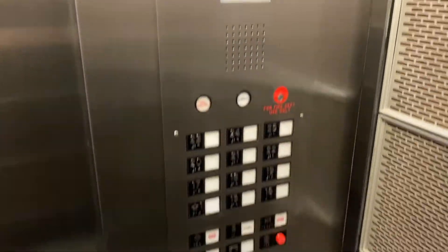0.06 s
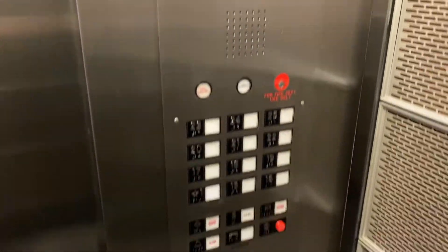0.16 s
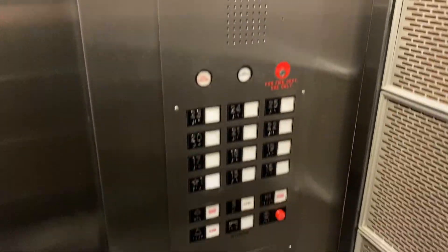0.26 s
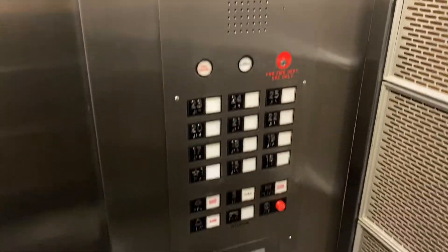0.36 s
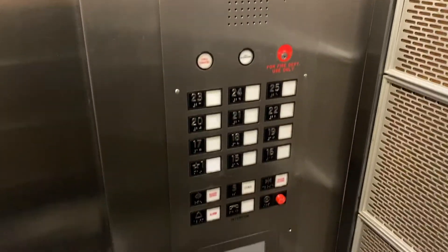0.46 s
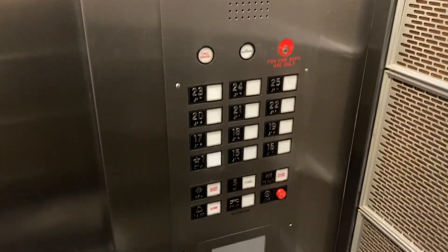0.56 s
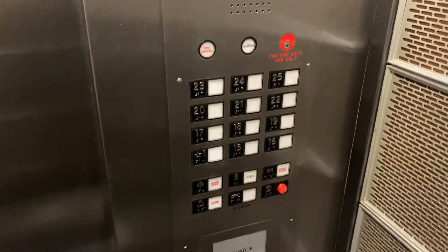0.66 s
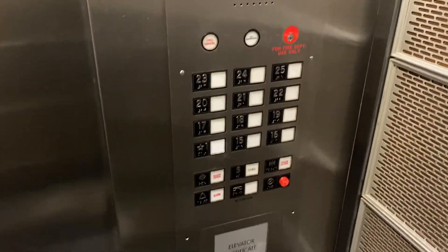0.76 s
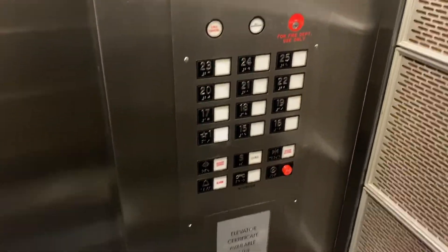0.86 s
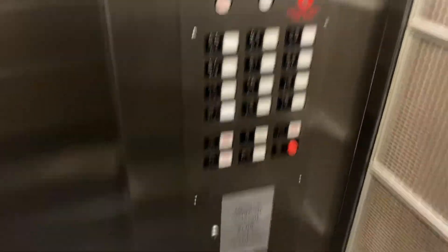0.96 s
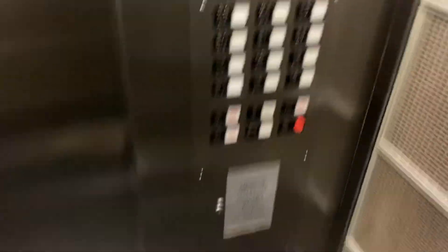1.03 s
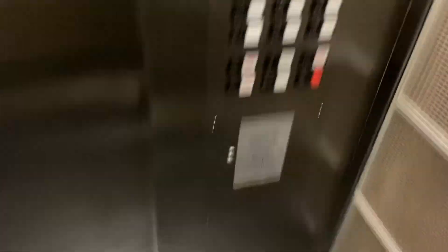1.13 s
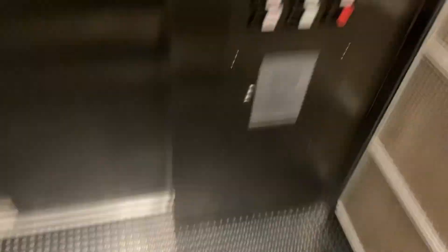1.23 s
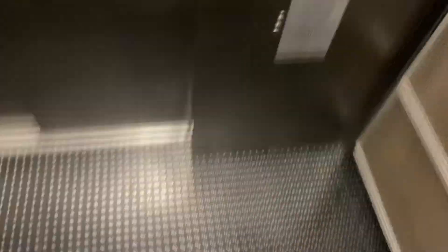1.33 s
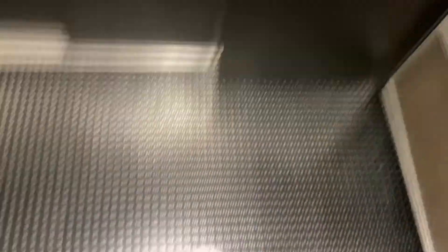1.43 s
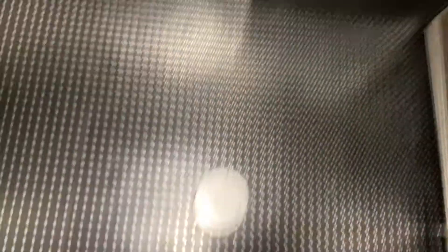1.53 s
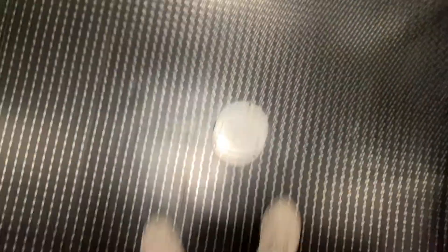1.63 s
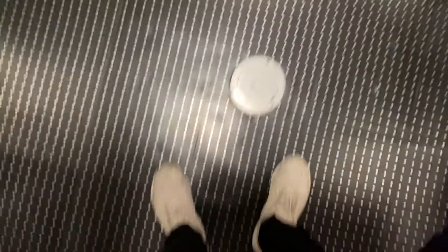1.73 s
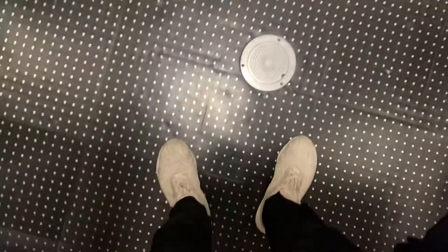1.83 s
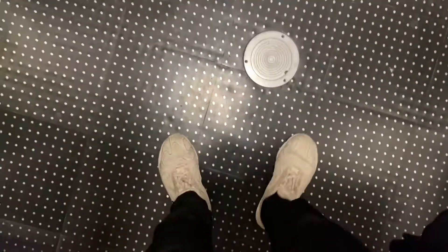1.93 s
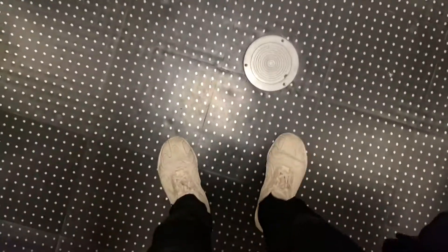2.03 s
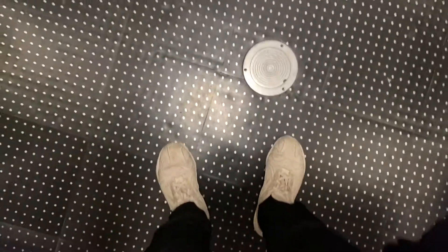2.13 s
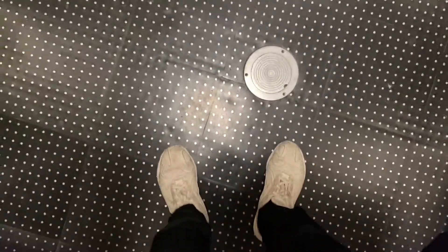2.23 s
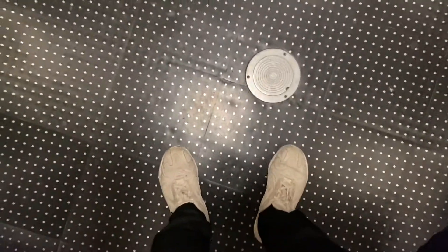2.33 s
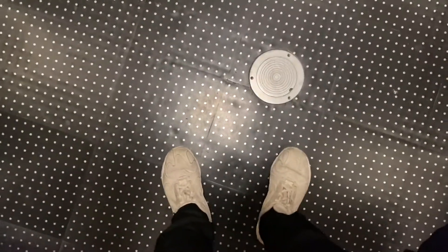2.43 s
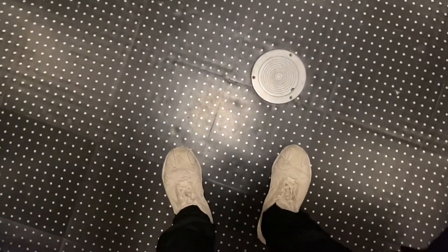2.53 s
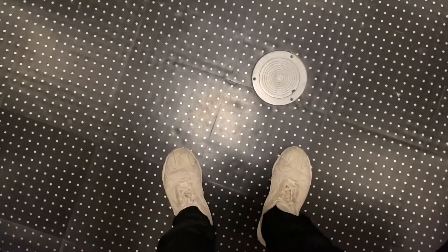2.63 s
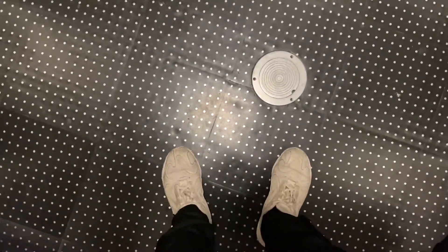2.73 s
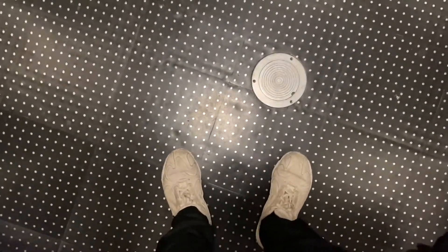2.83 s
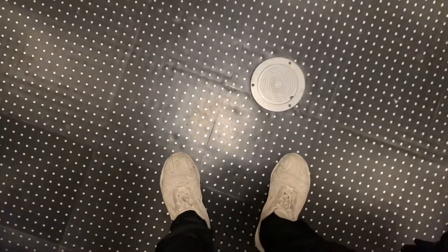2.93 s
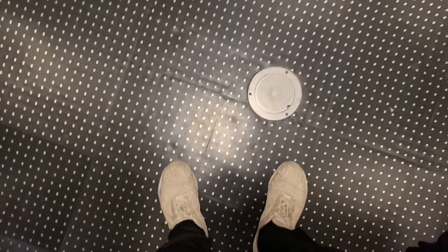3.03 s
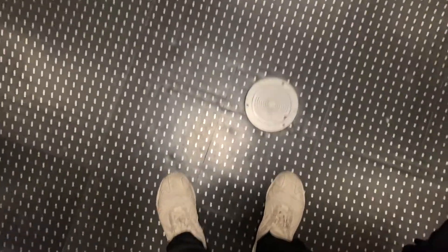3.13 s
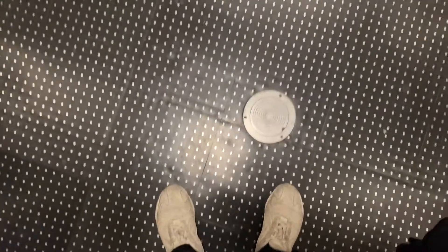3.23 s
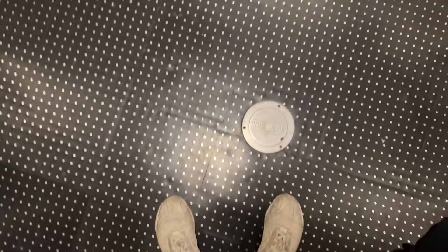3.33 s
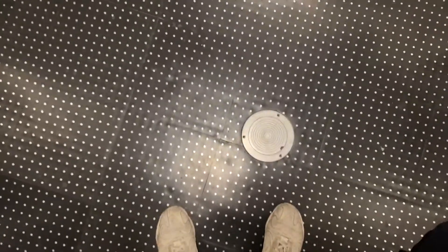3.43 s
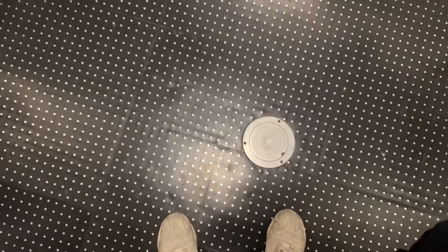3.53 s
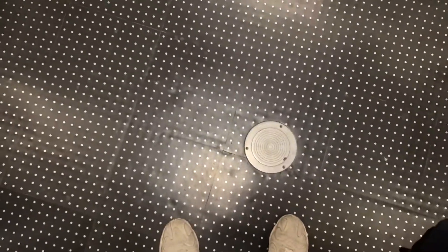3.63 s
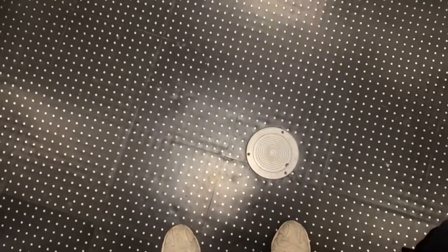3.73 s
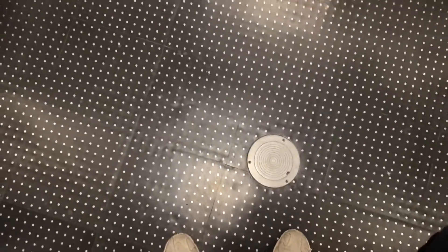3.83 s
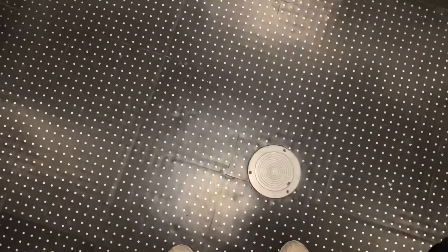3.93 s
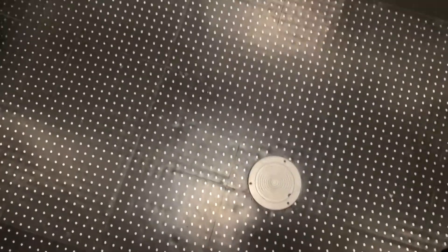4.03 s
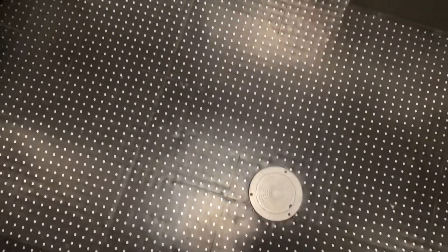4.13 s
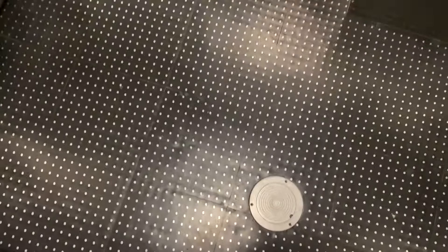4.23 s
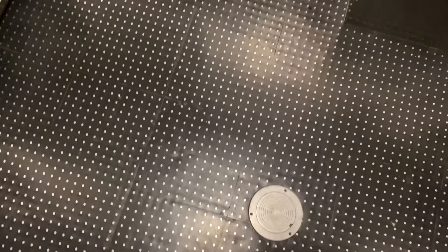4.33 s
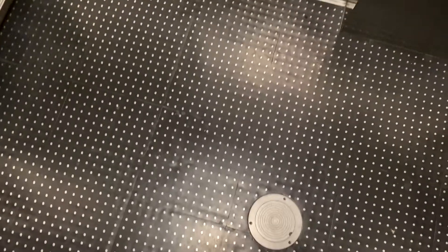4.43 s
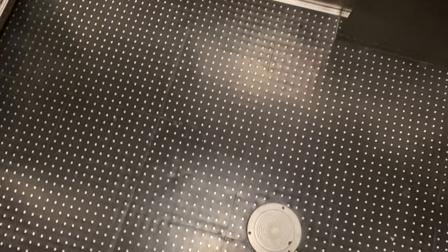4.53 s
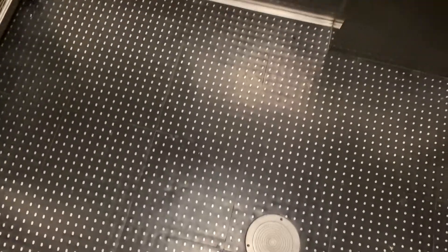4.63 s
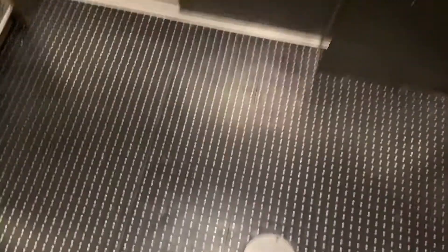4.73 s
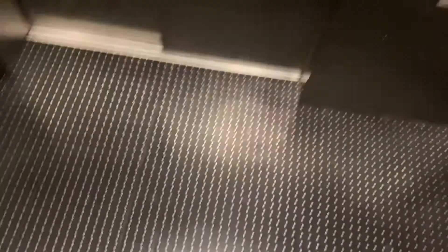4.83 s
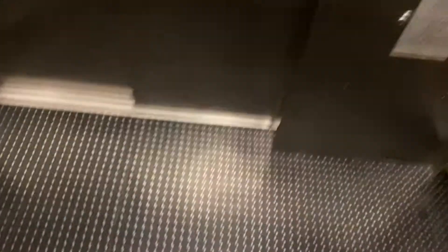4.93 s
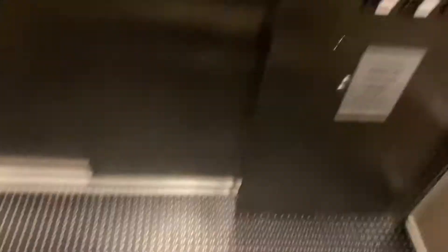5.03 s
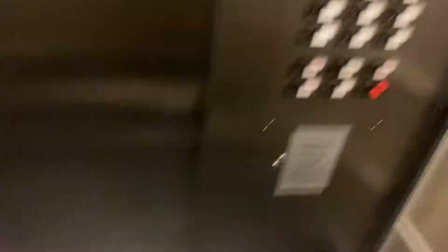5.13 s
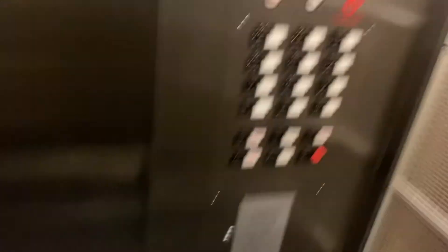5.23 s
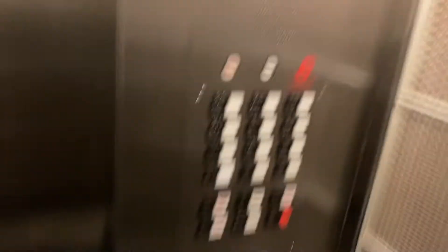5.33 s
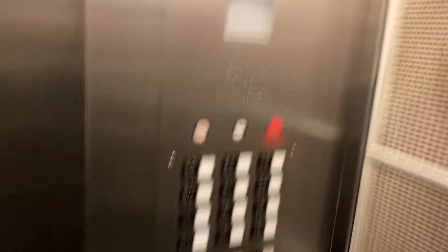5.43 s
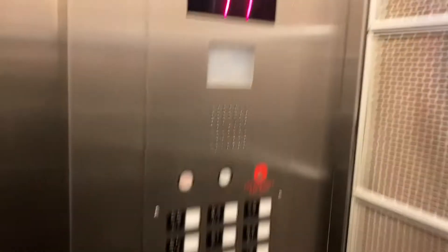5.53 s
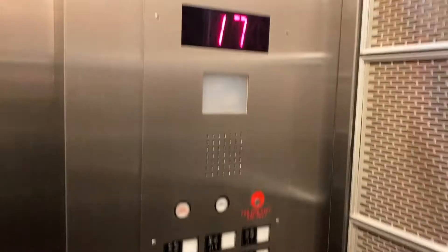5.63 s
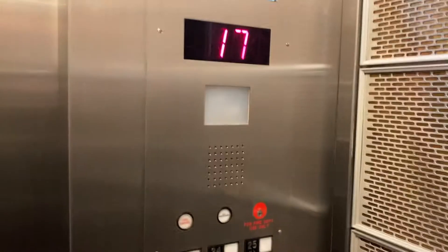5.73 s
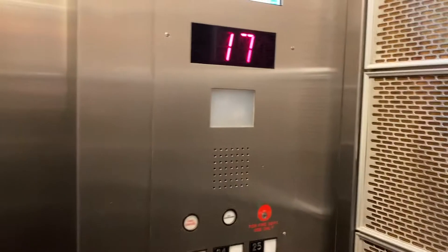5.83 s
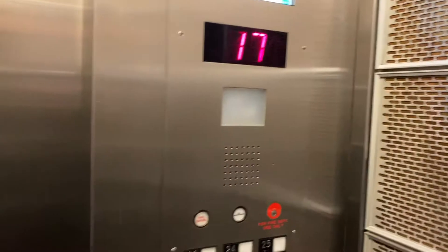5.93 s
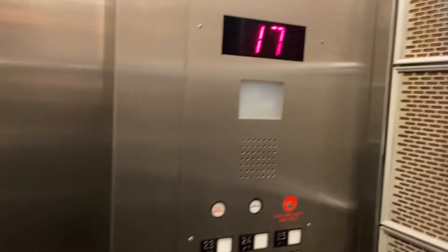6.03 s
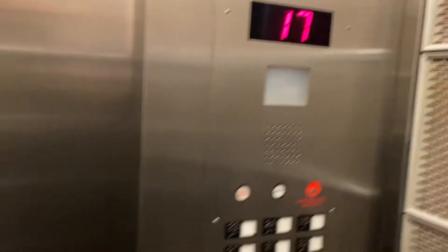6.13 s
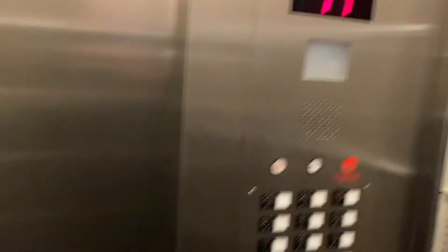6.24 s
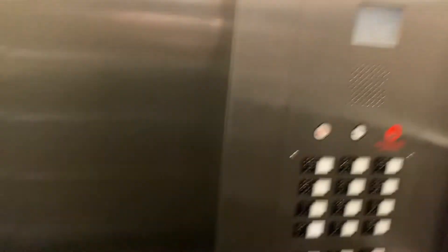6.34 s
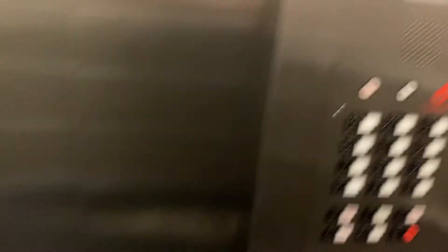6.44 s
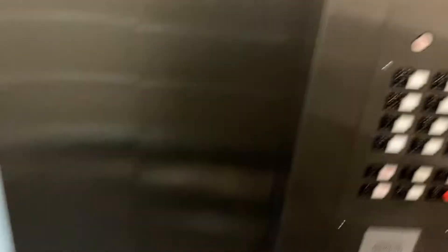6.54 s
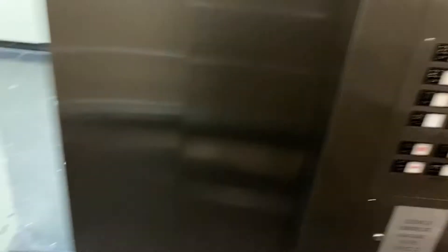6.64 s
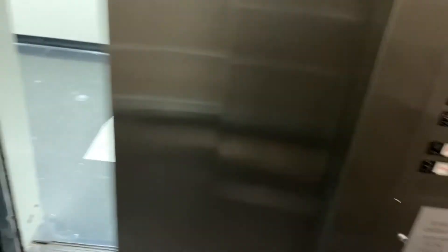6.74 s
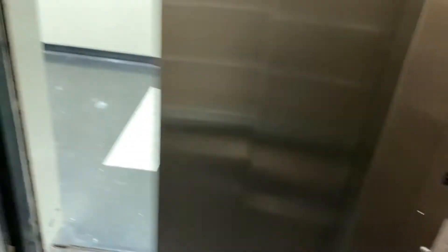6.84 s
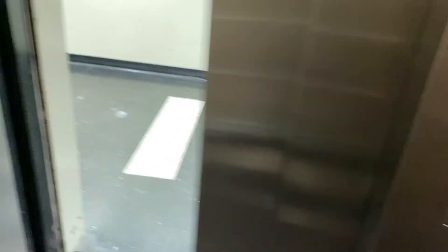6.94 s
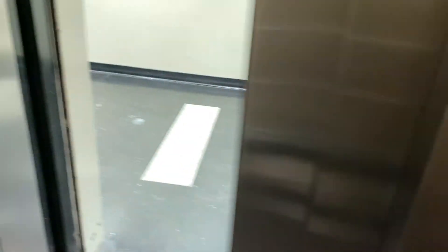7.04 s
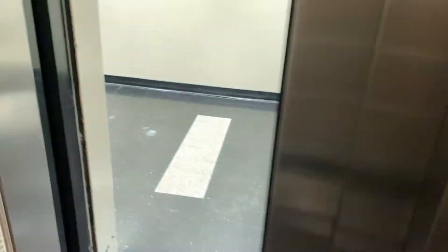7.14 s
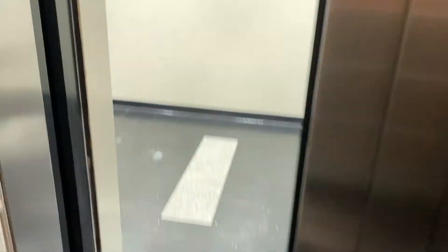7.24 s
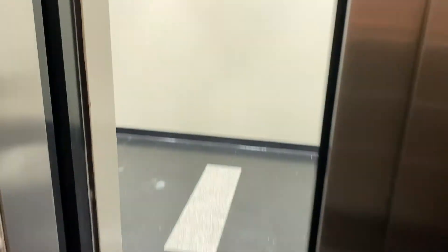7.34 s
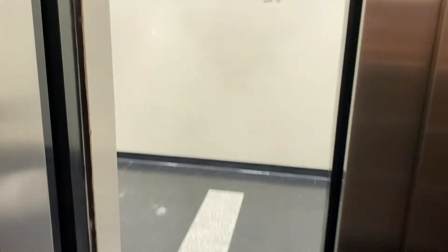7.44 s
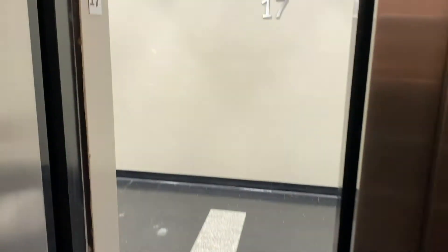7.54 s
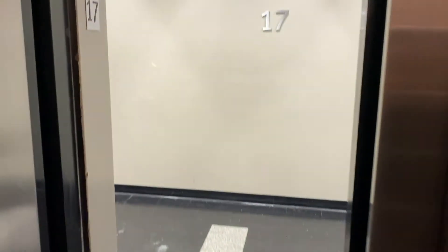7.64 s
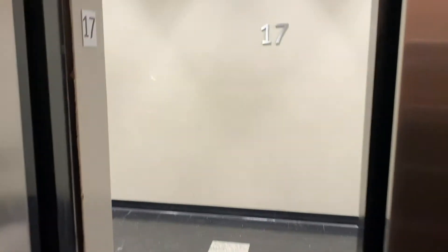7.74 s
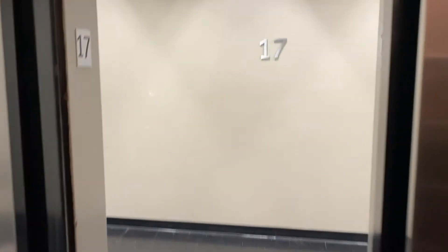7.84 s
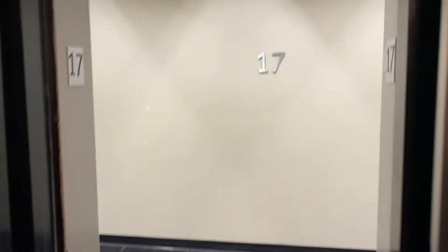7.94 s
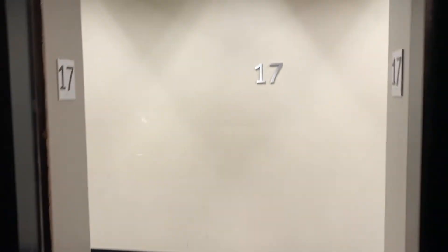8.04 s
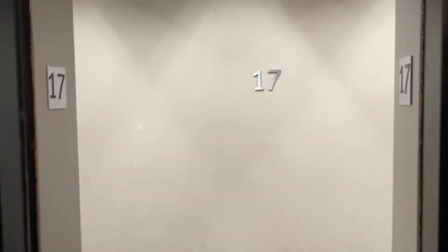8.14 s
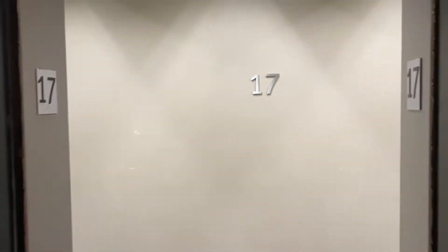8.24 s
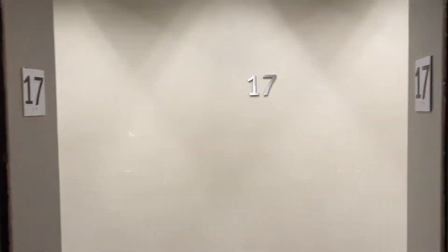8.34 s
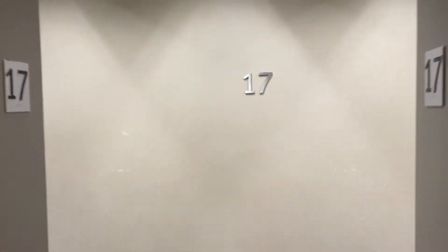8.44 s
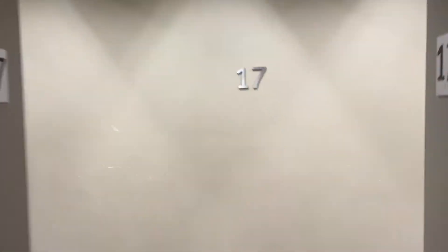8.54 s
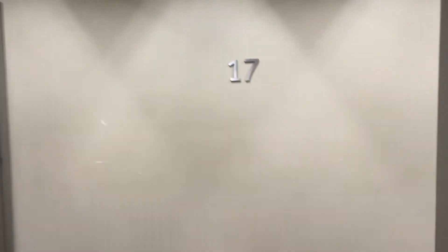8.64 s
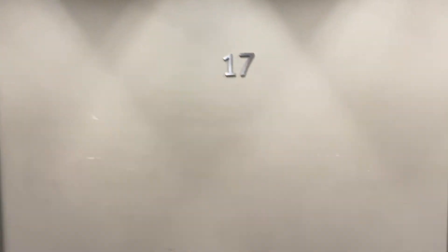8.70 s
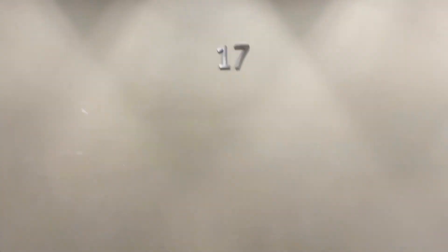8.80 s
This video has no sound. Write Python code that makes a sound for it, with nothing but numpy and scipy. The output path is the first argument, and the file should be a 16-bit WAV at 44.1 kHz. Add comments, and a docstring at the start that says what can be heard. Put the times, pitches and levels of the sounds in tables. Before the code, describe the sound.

Throughout, a deep hum near 120 Hz beats with a slightly higher fan tone, a fast throb of over ten pulses a second, above soft fan air in a small, ringing steel car. From 0 to 1.3 s the travel rumble and airy rush grow, then sink away by 3.5 s. Muffled hollow clacks come at 1.05 and 1.2 s with a short slide, then a cluster from 1.8 to 2.9 s with low floor thumps, tiny high squeaks and faint cloth rustle. A thin rub and squeal follow near 3.8 s, clacks at 4.2 s. The door unlocks softly around 5.1 s; clicks and short creaks run from 5.5 to 6.7 s. Rolling rumble and rattle build, with loud, bright metallic bangs crowded between 7.1 and 7.5 s. Slower knocks at 7.7, 8.0 and 8.55 s accompany a thin singing panel, landing air and fading hum until 8.9 s.

```python
"""A fan's blade tone throbs against mains hum in a steel elevator car that slows and opens its door.
Sines make the hum; coloured noise makes the rumble, air and cloth; decaying sines make the floor's jolts.
Gear outside clacks and squeaks: short noises and ringing resonances, smeared by the steel walls.
The linkage creaks in sliding tones; rollers, rattle and scrape are noises that follow the door's speed.
Knocks and bangs ring the door panel's modes, and air noise enters from the landing."""
import sys
import numpy as np
from scipy import signal
from scipy.fft import rfft, irfft, next_fast_len
from scipy.io import wavfile
from scipy.ndimage import map_coordinates

SR = 44100
rng = np.random.default_rng(int(sys.argv[2]) if len(sys.argv) > 2 else 0)


def waveform_to_disk(signal):
    """Save audio, clipped to [-1, 1], as 16-bit WAV at the path in sys.argv[1]."""
    frames = np.transpose(np.atleast_2d(signal))
    scaled = np.clip(frames, -1, 1) * 32767
    samples = np.round(scaled).astype(np.int16)
    wavfile.write(sys.argv[1], SR, samples)


N = 391166  # length in samples

# spectra of noises before levelling: hz [Hz], level_db [dB per Hz]
# deep rumble of the car and of the moving door
RUMBLE_SPECTRUM = [(10, -40), (27, -1), (38, -1.5), (55, 8), (66, 3), (82, -10), (105, -12.5), (150, -49.5),
                   (400, -130)]
# bright scrape, shared by ticks, cloth and hiss
BRIGHT_SPECTRUM = [(1500, -22), (2900, 10), (4000, 5.5), (5500, 2.5), (7000, 1.5), (9500, 2), (13400, -9),
                   (15500, -23.5)]
# hard contact of metal parts
CLACK_SPECTRUM = [(400, -16), (900, 4.5), (1250, 3.5), (1950, 2.5), (2600, 0), (3600, -6), (7000, -18)]
# air of the shaft and the landing
SHAFT_AIR_SPECTRUM = [(200, -7), (650, -6), (1300, -5), (2300, -13.5), (4500, -25), (9000, -43.5)]
# modes of the door panel: hz [Hz], level_db [dB], t60_s [s, when it rings freely]
PANEL_MODES = [(1120, -2, .42), (1287, -9, .36), (1413, -1, .24), (1625, -4, .26), (1739, -10, .22),
               (1966, -4, .32), (2078, -10, .24), (2200, -8, .24), (2384, -4, .22), (2579, -4, .26),
               (2817, -10, .2), (2918, -2, .22), (3175, -5.5, .2), (3635, -13, .18), (4151, -10.5, .18),
               (5350, -13, .15)]
# the door unlocks, runs open and creeps to its stop: time_s [s], speed [share of full speed]
DOOR_MOTION = [(5.08, 0.013), (5.2, 0.12), (5.85, 0.075), (6.4, 0.41), (6.65, 0.78), (7.28, 1), (7.55, 0.4),
               (7.9, 0.19), (8.2, 0.04)]


def amp(db):
    """Decibels to gain."""
    return 10 ** (np.asarray(db) / 20)


def unit(x):
    """Scaled to rms 1."""
    return x / np.sqrt(np.mean(x ** 2) + 1e-20)


def along(points, hz):
    """(Hz, value) points joined on a log frequency axis."""
    f, v = np.transpose(points)
    return np.interp(np.log(hz + 1), np.log(f + 1), v)


def curve(rows):
    """(s, value) points joined into one value per sample."""
    s, values = np.transpose(rows)
    return np.interp(np.arange(N) / SR, s, values)


def wobble(rate, size=N):
    """A smooth random curve, rate knots a second."""
    knots = rng.standard_normal(int(size * rate / SR) + 4)
    return map_coordinates(knots, [np.arange(size) * rate / SR])


def filtered(x, response):
    """x times a response of frequency."""
    n = x.shape[-1]
    m = next_fast_len(n + 8192)
    return irfft(rfft(x, m) * response(np.fft.rfftfreq(m, 1 / SR)), m)[..., :n]


def shape(spectrum):
    """The response of (Hz, dB) points."""
    return lambda hz: amp(along(spectrum, hz))


def resonances(modes):
    """Summed band resonances of (Hz, width Hz, dB), with alternating signs."""
    def response(f):
        total = 0
        for k, (centre, width, db) in enumerate(modes):
            damping = 1j * f * width
            total = total + (-1) ** k * amp(db) * damping / (centre ** 2 - f ** 2 + damping)
        return total
    return response


def focus(centre_hz, fall_db=5):
    """Harder contacts put their force higher up: a hump that falls by fall_db an octave off centre."""
    return lambda hz: amp(-fall_db * np.log2((hz + 1) / centre_hz) ** 2)


def noise(response, size=N):
    """Coloured stereo noise of rms 1: alike in the bass, scattered by the steel walls higher up."""
    # left-right likeness by frequency: hz [Hz], likeness [correlation]
    likeness = [(60, 0.94), (150, 0.92), (300, 0.63), (550, 0.012), (1500, 0.028), (3000, 0.065),
                (6000, 0.052)]

    def spread(hz):
        turn = np.arccos(np.clip(along(likeness, hz), -1, 1)) / 2
        return response(hz) * np.array([np.cos(turn), np.sin(turn)])

    mid, side = filtered(rng.standard_normal((2, size)), spread)
    return unit(np.array([mid + side, mid - side]))


def add(track, s, sound):
    """Mix a sound into a track at a time in seconds."""
    part = track[:, round(s * SR):][:, :sound.shape[-1]]
    part += sound[..., :part.shape[-1]]


def fade(t, attack, t60):
    """A quick rise and an exponential decay."""
    return (1 - np.exp(-t / attack)) * amp(-60 * t / t60)


def swell(s, length):
    """A smooth rise and fall around a moment, at half gain half a length away."""
    return 1 / (1 + (2 * (np.arange(N) / SR - s) / length) ** 4)


def swells(rows):
    """The summed gain of (s, length s, dB) swells."""
    return sum(amp(db) * swell(s, length) for s, length, db in rows)


def held(start, rise, hold, t60, db):
    """Gain of a sound that rises, holds and dies away (times in seconds)."""
    t = np.arange(N) / SR - start
    return np.clip(t / rise, 0, 1) * amp(db - 60 * np.maximum(t - rise - hold, 0) / t60)


def driven(speed, db, power):
    """Gain of a noise that grows as a power of speed, db at full speed."""
    return amp(db) * np.maximum(speed, 0) ** power


def blow(t, centre_hz, body_db, tick_db, body_spectrum, t60):
    """One contact smeared by the small steel car: dull body, hard clack and bright tick."""
    hard = lambda hz: shape(CLACK_SPECTRUM)(hz) * focus(centre_hz, fall_db=3.5)(hz)
    body = amp(body_db) * noise(shape(body_spectrum), size=len(t)) * fade(t, attack=.0011, t60=.46)
    clack = amp(1.5) * noise(hard, size=len(t))
    tick = amp(tick_db + 6.5) * noise(shape(BRIGHT_SPECTRUM), size=len(t))
    # the first reflections crowd together, then the car rings on; the tick dies sooner
    crowded = 0.12 * fade(t, attack=.0005, t60=.022)
    clack_fade = fade(t, attack=.00079, t60=t60) + crowded
    return body + clack * clack_fade + tick * fade(t, attack=.00071, t60=0.76 * t60)


def rubbing(t, length, modes):
    """Uneven friction feeds resonances for a moment; the sound then dies in the car."""
    hold = np.minimum(t / .008, 1) * amp(-60 * np.maximum(t - length * 0.13, 0) / .37)
    slips = unit(amp(3 * wobble(110, size=len(t))))  # friction sticks and slips unevenly
    return hold * slips * noise(resonances(modes), size=len(t))


def glide(length, from_hz, to_hz, overtone_db, rough):
    """A stick-slip tone that slides in pitch with a jittering phase, smeared by the car; level about 1."""
    t = np.arange(round(length * SR)) / SR
    pitch_hz = from_hz + (to_hz - from_hz) * t / length
    phase = 2 * np.pi * np.cumsum(pitch_hz) / SR + rough * wobble(110, size=len(t))
    slip = np.sqrt(np.sin(np.pi * t / length)) * (np.sin(phase) + amp(overtone_db) * np.sin(2 * phase))
    after = np.arange(SR // 3) / SR
    walls = rng.standard_normal((2, len(after))) * amp(-60 * after / 0.38)  # the car's t60 in s
    walls[:, 0] = np.linalg.norm(walls, axis=1)  # the direct sound is as strong as its echoes
    heard = signal.fftconvolve(slip[None], walls, axes=1)
    return heard * np.sqrt(len(t) / np.sum(np.mean(heard ** 2, axis=0)))


def tone(hz, wander, rough):
    """A thin, wavering stereo tone of rms 1 whose phase wanders slowly and jitters fast (radians)."""
    phase = 2 * np.pi * hz * np.arange(N) / SR + wander * wobble(13)
    jitter = rough * np.array([wobble(90), wobble(90)])
    return unit(amp(1.6 * wobble(26)) * np.sin(phase + jitter))


def chatter(rate):
    """The loose panel taps at random moments and rings briefly, damped by its guides; rms 1."""
    taps = (rng.random(N) < rate / SR) * amp(rng.normal(0, 2, (2, N)))
    damped = resonances([(hz, 10 / t60, db) for hz, db, t60 in PANEL_MODES])
    return unit(filtered(taps, damped))


def opening():
    """Share of its travel that the door has covered."""
    travel = np.cumsum(curve(DOOR_MOTION))
    return travel / travel[-1]


def hum():
    """Ten fan blades sound just above the mains hum and throb with it; weaker tones change with the tilt."""
    # turning speed of the fan shaft: time_s [s], speed [turns per second]
    shaft_speed = [(0, 13.6), (.5, 13.41), (1, 13.375), (2, 13.355), (3, 13.332), (5, 13.323), (6, 13.298),
                   (8.87, 13.274)]
    # weaker fan tones, which stand as waves in the car:
    # order [multiple of the shaft speed], upright_db [dB, microphone upright], tipped_db [dB, tipped down]
    fan_tones = [(12, -60, -56), (19, -54.5, -63.5), (20, -59.5, -49.5), (23, -60, -61), (24, -57, -55.5),
                 (26, -49, -54.5), (27, -62.5, -51), (28, -65, -51), (30, -51, -57.5)]
    # hum at the microphone, which leaves the car at the end: time_s [s], level_db [relative dB]
    hum_level = [(0, -0.5), (.5, 1.7), (1.9, -0.9), (3, -1.5), (5, 0.5), (6.8, 0.4), (7.5, -0.5),
                 (8.3, -2.5), (8.87, -7.5)]
    # the microphone tips towards the floor and back: time_s [s], tilt [share]
    microphone_tilt = [(1, 0.13), (1.7, 1), (4.4, 1), (5.3, 0.15)]
    mains_hz, mains_db, blade_db = 119.895, -30, -32.5

    level_db, tilt = curve(hum_level), curve(microphone_tilt)
    shaft = 2 * np.pi * np.cumsum(curve(shaft_speed)) / SR
    mains_gain = amp(mains_db + level_db + 0.21 * wobble(3.1))
    out = mains_gain * np.sin(2 * np.pi * mains_hz * np.arange(N) / SR)
    out += amp(blade_db + level_db + 0.5 * wobble(6)) * np.sin(10 * shaft)
    for order, upright_db, tipped_db in fan_tones:
        tone_db = upright_db + (tipped_db - upright_db) * tilt + level_db + 2 * wobble(4)
        out += amp(tone_db) * np.sin(order * shaft + .5 * wobble(4))
    return out


def ride():
    """Fan air as gently wavering noise, rumble and rush that follow the car's speed, and floor jolts."""
    # the car's rush grows a little, falls to a halt, then a slow creep remains:
    # time_s [s], speed [share of full speed]
    car_motion = [(0, 0.78), (1.3, 1), (2.6, 0.31), (3.5, 0), (4.2, 0.17)]
    # jolts of the car floor, bouncing on its springs: start_s [s], level_db [dB, before the fade]
    floor_jolts = [(0.281, -21), (2.03, -33), (2.253, -17), (2.469, -24.5), (2.634, -24), (2.873, -26),
                   (5.539, -25), (8.14, -20.5), (8.719, -27.5)]
    # fan air inside the car: hz [Hz], level_db [dB per Hz, before levelling]
    fan_air = [(40, -29.5), (80, -11), (105, -11.5), (135, -6), (162, -10.5), (195, -28), (235, -19.5),
               (370, -17.5), (430, -29), (500, -26), (650, -37.5), (1300, -41.5), (2250, -47.5),
               (3500, -63.5), (6000, -75), (15000, -89)]
    air_db, idle_rumble_db, jolt_hz = -39, -55.5, 52

    speed = curve(car_motion)
    out = amp(air_db + 1.52 * wobble(3.268)) * noise(shape(fan_air))
    rumble_gain = np.hypot(amp(idle_rumble_db), driven(speed, db=-38.5, power=1.4))
    out += rumble_gain * amp(1.2 * wobble(7.3)) * noise(shape(RUMBLE_SPECTRUM))
    out += driven(speed, db=-60, power=3.4) * noise(shape(SHAFT_AIR_SPECTRUM))
    t = np.arange(SR) / SR
    for s, db in floor_jolts:
        add(out, s, amp(db) * np.sin(2 * np.pi * jolt_hz * t) * fade(t, attack=.013, t60=.31))
    return out


def clothes():
    """Faint rubbing of cloth: bright noise whose level flickers finely."""
    # rubs of clothing: peak_s [s], length_s [s], level_db [dB]
    rustles = [(1.485, 0.52, -71.5), (1.997, 0.27, -67), (5.35, 0.14, -66.5)]
    floor_db = -96  # cloth between the rubs
    rubs = amp(floor_db) + swells(rustles)
    grain = unit(amp(1.2 * wobble(500)))
    return rubs * amp(2.2 * wobble(44)) * grain * noise(shape(BRIGHT_SPECTRUM))


def gear():
    """Hollow clacks, each with its own main resonance, a slide, a rub and thin squeaks as the car levels."""
    # clacks outside the car: start_s [s], level_db [dB, before a 10 dB cut], centre_hz [Hz],
    # body_db, tick_db, ring_db [relative dB], hollow_hz [Hz], hollow_db [relative dB], t60_s [s, of the clack]
    clacks = [(1.051, -38, 1400, 5, -30, -8, 627, -9, 0.43),
              (1.224, -38.5, 1100, 12, -17, -1.5, 1136, 0, 0.53),
              (1.835, -38, 1030, 5.5, -14.5, -3, 418, -9, 0.44),
              (2.015, -36, 1150, 12.5, -21.5, 6.5, 580, 9.5, 0.45),
              (2.223, -35, 1750, 6.5, -33, 2.5, 1920, 2, 0.35),
              (2.264, -45.5, 1820, 1, -8, -8, 520, -10, 0.54),
              (2.437, -38.5, 1580, 10, -25, 8, 466, 11, 0.4),
              (2.624, -41.5, 1500, 11, -35, 5.5, 473, 1, 0.42),
              (2.86, -38, 1320, 8.5, -36, 5, 487, 11, 0.4),
              (4.201, -39.5, 1000, 8, -34, -8, 507, -0.5, 0.98),
              (4.252, -41, 1520, 5, -5.5, -5, 1206, -7, 0.33),
              (5.121, -42, 725, -7, -5, -12, 1240, -11, 0.7),
              (5.285, -41, 1800, -5, -13.5, -8, 1530, -11, 0.56),
              (5.883, -33.5, 1300, -15, -15, -6, 935, -4.5, 0.47),
              (5.905, -38, 1136, 7.5, -3.5, 1, 1220, -6, 0.45),
              (6.075, -44.5, 830, 8, -1.5, 1, 504, 0, 0.47)]
    # dull body of a clack: hz [Hz], level_db [dB per Hz, before levelling]
    clack_body = [(100, -40.5), (230, 3.5), (350, -4.5), (490, -2), (620, -6), (800, -10), (1300, -45.5),
                  (2500, -85)]
    # squeaks of the guides: start_s [s], length_s [s, 13 % of it held],
    # squeal_db [dB], chirp_db [dB], chirp_hz [Hz]
    squeaks = [(2.483, .06, -66, -64, 12000), (2.583, .04, -65, -63, 11700),
               (2.638, 0.056, -62.5, -51.5, 12100), (2.855, .04, -64.5, -63.5, 12100),
               (2.987, 0.06, -65.5, -62.5, 12300), (3.062, 0.1, -67, -65, 12100)]
    # sliding squeals: start_s [s], length_s [s], from_hz [Hz], to_hz [Hz], level_db [dB]
    squeals = [(3.73, .18, 2575, 2540, -65), (3.87, .17, 2540, 2580, -68)]
    # resonances of the clacks, the squeal, the chirp besides its main pitch, and the long rub:
    # hz [Hz], width_hz [Hz], level_db [relative dB]
    gear_modes = [(930, 50, 3), (1228, 71, 1.5), (1373, 51, 1), (1820, 130, 1.5), (2220, 99, -4.5),
                  (3040, 44, -21)]
    squeal_modes = [(5120, 160, 5), (7100, 230, -7)]
    chirp_modes = [(8800, 250, -5), (11500, 280, -8), (13250, 200, -10)]
    rub_modes = [(2470, 130, 1.5), (4860, 450, -8)]
    direct_db, hollow_direct_db = -6.5, 5.5  # first ring of the gear modes and of the main resonance

    rub = held(start=3.69, rise=.064, hold=.25, t60=.38, db=-69.5)
    out = rub * amp(1.2 * wobble(26)) * noise(resonances(rub_modes))
    # the gear slides on after its first clacks
    slide = held(start=1.05, rise=.23, hold=.045, t60=.73, db=-57)
    out += slide * noise(lambda hz: shape(CLACK_SPECTRUM)(hz) * shape(SHAFT_AIR_SPECTRUM)(hz))

    t = np.arange(SR // 2) / SR
    for s, db, centre_hz, body_db, tick_db, ring_db, hollow_hz, hollow_db, t60 in clacks:
        modes = [(hz, ring_db + level + direct_db) for hz, _, level in gear_modes]
        modes.append((hollow_hz, hollow_db + hollow_direct_db))
        direct = 0
        for hz, level in modes:
            strength = amp(level + rng.normal(0, 2))
            direct += strength * np.sin(2 * np.pi * (hz * rng.normal(1, .02) * t + rng.random()))
        ring_response = lambda hz: resonances(gear_modes)(hz) * focus(centre_hz)(hz)
        hollow_response = lambda hz: resonances([(hollow_hz, 110, 0)])(hz) ** 2
        ring = amp(ring_db) * noise(ring_response, size=len(t))
        hollow = amp(hollow_db) * noise(hollow_response, size=len(t))
        first_ring = direct * fade(t, attack=.003, t60=.08)
        late_ring = (ring + hollow) * fade(t, attack=.00056, t60=0.66 * t60)
        contact = blow(t, centre_hz, body_db, tick_db, clack_body, t60)
        add(out, s, amp(db - 10) * (contact + first_ring + late_ring))

    for s, length, squeal_db, chirp_db, chirp_hz in squeaks:
        squeal = amp(squeal_db) * rubbing(t, length, squeal_modes)
        chirp = amp(chirp_db) * rubbing(t, length, chirp_modes + [(chirp_hz, 180, 8.5)])
        add(out, s, squeal + chirp)
    for s, length, from_hz, to_hz, db in squeals:
        add(out, s, amp(db) * glide(length, from_hz, to_hz, overtone_db=-13, rough=.47))
    return out


def ticks():
    """A sharp direct click near the microphone, then the weaker answer of the steel walls."""
    # sharp ticks: start_s [s], level_db [dB, of the click]
    sharp_ticks = [(1.539, -54), (4.109, -60.5), (5.524, -60.5), (6.267, -47), (7.262, -37), (7.588, -40.5),
                   (7.703, -40.5), (8.274, -45)]
    click_t60, echo_db = .014, -7.5  # s, dB
    out, t = np.zeros((2, N)), np.arange(SR // 4) / SR
    for s, db in sharp_ticks:
        envelope = amp(-60 * t / click_t60) + amp(echo_db) * fade(t, attack=.002, t60=.28)
        add(out, s, amp(db) * noise(shape(BRIGHT_SPECTRUM), size=len(t)) * envelope)
    return out


def door_rolling():
    """The linkage creaks, rollers rumble on the track and rattle the panel; the rubbed door panel sings."""
    # creaks of the linkage: start_s [s], length_s [s], from_hz [Hz], to_hz [Hz], level_db [dB]
    creaks = [(5.548, 0.071, 958, 853, -52), (5.658, 0.057, 1080, 1470, -53.5),
              (6.181, .025, 1445, 1710, -52.5), (6.187, 0.024, 917, 860, -49),
              (6.265, 0.056, 1900, 1650, -53), (6.28, 0.027, 1403, 1270, -53.5),
              (6.53, .035, 1594, 1720, -52), (6.726, 0.028, 1025, 940, -44)]
    # the door drags on its guides: peak_s [s], length_s [s], hiss_db [dB], rattle_db [dB]
    drags = [(5.667, 0.17, -66, -56.5), (6.992, 0.096, -49.5, -55), (7.28, 0.19, -52.5, -42.5),
             (7.454, 0.073, -51, -53), (7.678, 0.16, -56.5, -50)]
    # spells of the door panel singing as it rubs and creeps: peak_s [s], length_s [s], level_db [dB]
    singing_spells = [(7.705, 0.64, -55), (8.39, 0.2, -53), (8.64, 0.26, -56)]
    # tones of the singing panel: hz [Hz], level_db [relative dB]
    singing_tones = [(1130, -3), (1956, 0), (2268, -4), (2372, -4.5)]
    # rollers and track rattle: hz [Hz], level_db [dB per Hz, before levelling]
    roller_spectrum = [(20, -30.5), (32, -12.5), (60, -7), (81, 13.5), (98, -3), (150, -2), (250, 1.5),
                       (350, -11.5), (500, -15.5), (800, -19), (1500, -58.5), (3000, -130)]
    track_spectrum = [(300, -9.5), (500, 4.5), (720, -4), (1040, 5), (1490, -3.5), (1980, -4), (2400, -4),
                      (2900, -22), (3500, -13), (5000, -18.5), (7000, -29.5)]
    recede_db = 4  # the rollers move away from the microphone over the door's travel
    chatter_db = -15.5  # the panel's taps relative to the track rattle

    speed = curve(DOOR_MOTION)
    bumps = amp(2.2 * wobble(45))
    shaking = driven(speed, db=-47.5, power=.6) + swells([(s, length, db) for s, length, _, db in drags])
    scraping = driven(speed, db=-55.5, power=1.4) + swells([(s, length, db) for s, length, db, _ in drags])
    rumble = driven(speed, db=-30, power=.53) * noise(shape(RUMBLE_SPECTRUM))
    roller_gain = driven(speed, db=-29.5, power=.81) * amp(3.1 * wobble(20))
    rollers = roller_gain * noise(shape(roller_spectrum))
    rattle = shaking * (bumps * noise(shape(track_spectrum)) + amp(chatter_db) * chatter(rate=80))
    scrape = scraping * bumps * amp(1.1 * wobble(270)) * noise(shape(BRIGHT_SPECTRUM))
    singing = unit(sum(amp(db) * tone(hz, wander=1.25, rough=.9) for hz, db in singing_tones))
    out = amp(-recede_db * opening()) * (rumble + rollers) + rattle + scrape
    out += swells(singing_spells) * singing
    for s, length, from_hz, to_hz, db in creaks:
        add(out, s, amp(db) * glide(length, from_hz, to_hz, overtone_db=-18, rough=1.25))
    return out


def landing():
    """Air noise from the landing comes in as the doorway widens."""
    air = amp(-53) * noise(shape(SHAFT_AIR_SPECTRUM))
    hiss = amp(-60) * noise(shape(BRIGHT_SPECTRUM))
    return opening() * (air + hiss)


def door_knocks():
    """Every knock on the track rings the panel's modes around its centre pitch, at new strengths."""
    # knocks of the door: start_s [s], level_db [dB, before an 11.5 dB cut], centre_hz [Hz],
    # body_db, tick_db, ring_db [relative dB], narrow_db [dB drop an octave off centre], t60_s [s]
    knocks = [(6.654, -30.5, 1050, 11.5, -11, -4, 17, 0.35), (6.723, -36.5, 2740, -11, -14, -3, 20, 0.7),
              (6.778, -30.5, 1660, 4, -13, -8, 15, 0.31), (6.92, -40, 2200, -6, -22, 1.5, -1, 0.41),
              (6.963, -35, 1060, -12, -13, 3.5, 5, 0.36), (7.119, -22.5, 1790, -11, -8, -5, 17, 0.18),
              (7.129, -22.5, 1400, -1, -28, -10, 30, 0.24), (7.18, -31.5, 950, 3, -22, -4, 30, 0.35),
              (7.214, -24.5, 2950, -3, -8.5, 5, 150, 0.13), (7.224, -29, 2300, 2, -21, 6, 120, 0.23),
              (7.251, -28.5, 2780, 4.5, -12, 0, 50, 0.24), (7.284, -29.5, 2150, -3, -4.5, 8.5, 31, 0.18),
              (7.336, -30.5, 2600, -13, -11, 2, 40, .2), (7.368, -33.5, 2900, -17, -5.5, -1, 18, 0.26),
              (7.412, -25, 2750, -20, -12, -0.5, 20, 0.18), (7.461, -28.5, 1330, -2, -9.5, -11, 10, 0.29),
              (7.703, -31, 800, 6, -25, -12, 10, 0.36), (7.854, -34, 1100, -15, -10.5, -13, 7, 0.27),
              (8.024, -25.5, 1470, 7, -20, -5, 9, 0.41), (8.03, -23.5, 2500, -12, -26, 1.5, 6, 0.39),
              (8.274, -34.5, 1974, 1, -16, -6, 12, 0.28), (8.541, -40, 2280, -4, -24, 5, 30, .16),
              (8.547, -33, 1400, 4, -30, 11, 100, 0.2), (8.552, -35, 1080, -6, -22, 10.5, 120, 0.28),
              (8.704, -35.5, 1150, 5, -14, -15, 17, 0.42), (8.83, -33.5, 1900, 0, -11, 2.5, 16, 0.074)]
    # dull boom of the door: hz [Hz], level_db [dB per Hz, before levelling]
    door_boom = [(100, -29), (190, 3), (280, -2.5), (400, -4.5), (520, -6.5), (800, -13), (1300, -34),
                 (2500, -80)]
    detune = .0045  # the modes shift as the panel moves along the track
    free_t60 = 0.3  # s; a knock this long rings the panel freely, the guides damp shorter ones

    out, t = np.zeros((2, N)), np.arange(SR // 2) / SR
    for s, db, centre_hz, body_db, tick_db, ring_db, narrow_db, knock_t60 in knocks:
        ring = np.zeros((2, len(t)))
        for hz, level, mode_t60 in PANEL_MODES:
            strength = amp(level + rng.normal(0, 2, (2, 1))) * focus(centre_hz, fall_db=narrow_db)(hz)
            phase = 2 * np.pi * rng.random() + rng.normal(0, 1.0, (2, 1))
            wave = np.sin(2 * np.pi * hz * rng.normal(1, detune) * t + phase)
            ring += strength * wave * fade(t, attack=.0011, t60=mode_t60 * knock_t60 / free_t60)
        contact = blow(t, centre_hz, body_db, tick_db, door_boom, knock_t60)
        add(out, s, amp(db - 11.5) * (contact + amp(ring_db) * ring))
    return out


def scene():
    """All sources; the car's standing waves favour one side or the other by frequency."""
    # balance of the sides: hz [Hz], lean_db [dB, left minus right]
    side_lean = [(30, 0), (120, -3.5), (280, -2.5), (500, -1.5), (750, 6), (1200, 0.5), (2500, 1),
                 (4000, 4.5), (5500, 10), (7800, 1.5)]
    car = hum() + ride() + clothes() + gear() + ticks() + door_rolling() + landing() + door_knocks()
    return filtered(car, lambda hz: amp(along(side_lean, hz) * np.array([[.5], [-.5]])))


def record(dry):
    """The left side's top octave feeds both sides, its phase turned opposite ways; the band is limited."""
    split_hz, top_hz = 7600, 15600
    opposed_hz, turn_hz = 8450, 3750  # where the sides oppose, and the span of half a turn per side
    below = lambda hz, edge_hz: .5 - .5 * np.tanh((hz - edge_hz) / 60)
    shift = lambda hz: np.pi * (.5 + (hz - opposed_hz) / turn_hz) * np.array([[1], [-1]])
    top = filtered(dry[0], lambda hz: (1 - below(hz, split_hz)) * np.exp(1j * shift(hz)))
    low = filtered(dry, lambda hz: below(hz, split_hz))
    return filtered(low + top, lambda hz: below(hz, top_hz))


dry = scene()
out = record(dry)
waveform_to_disk(out)
```